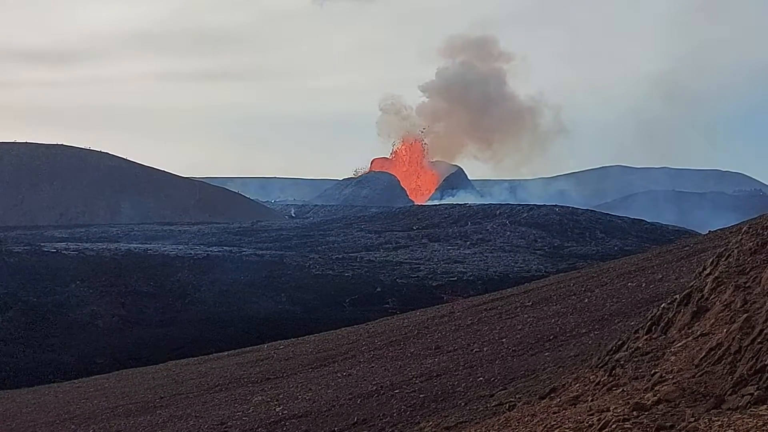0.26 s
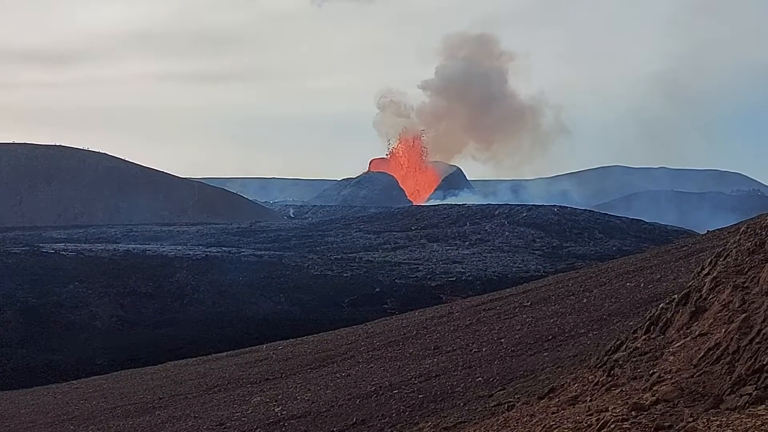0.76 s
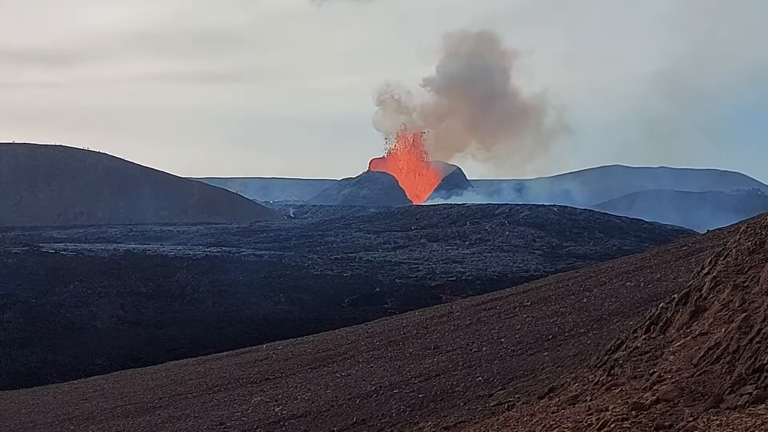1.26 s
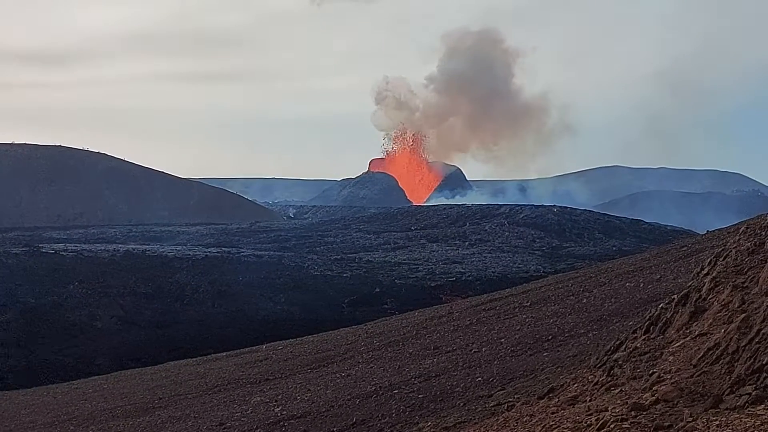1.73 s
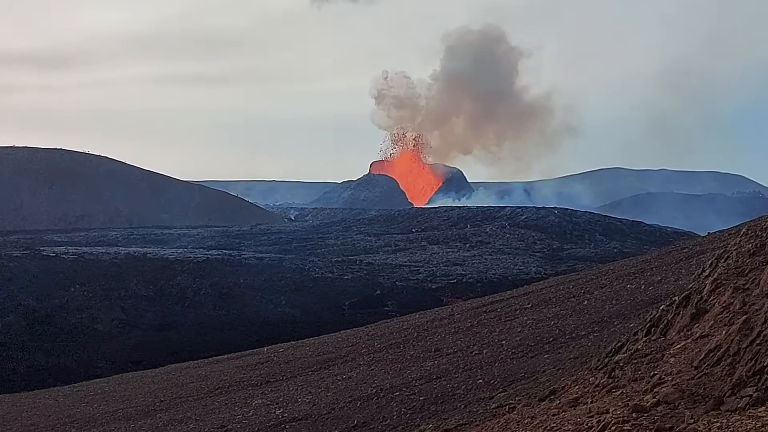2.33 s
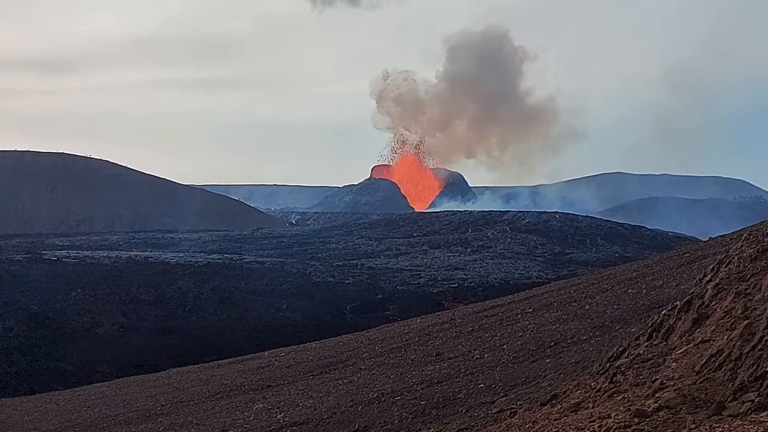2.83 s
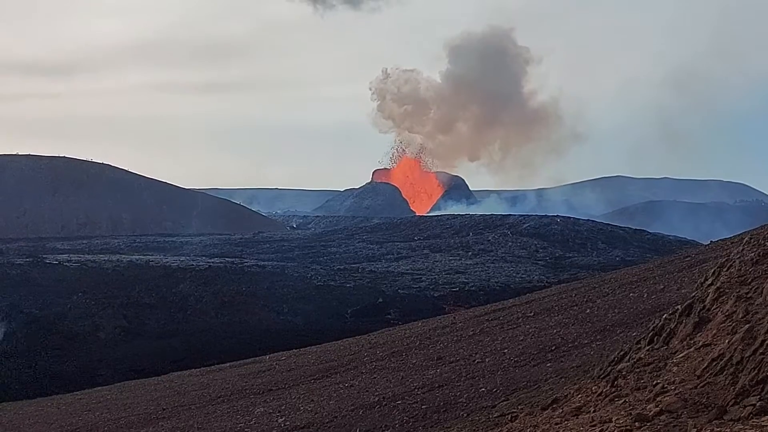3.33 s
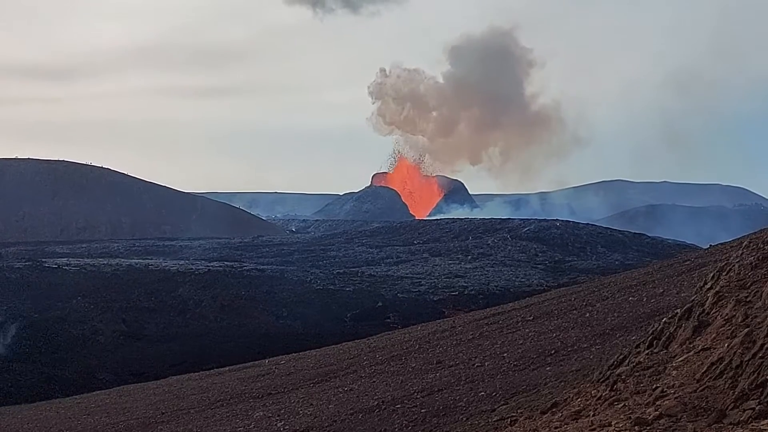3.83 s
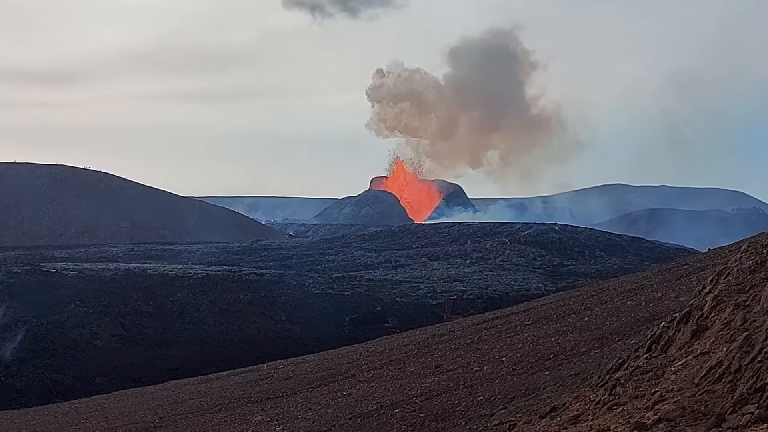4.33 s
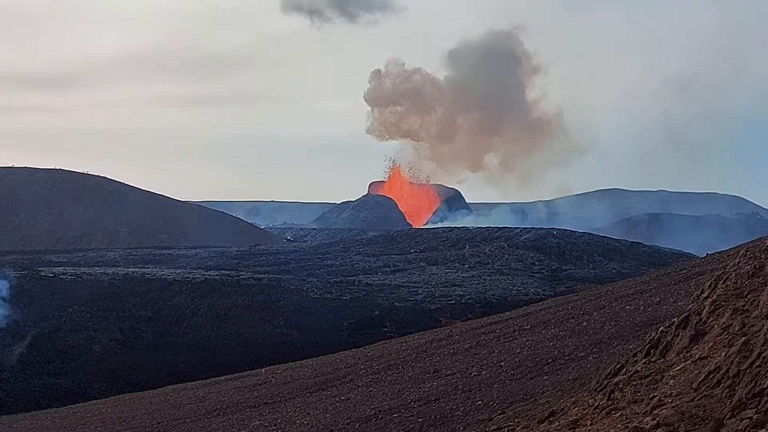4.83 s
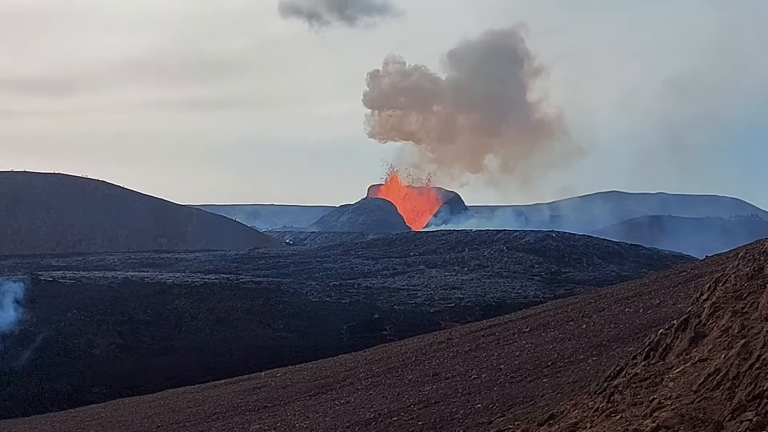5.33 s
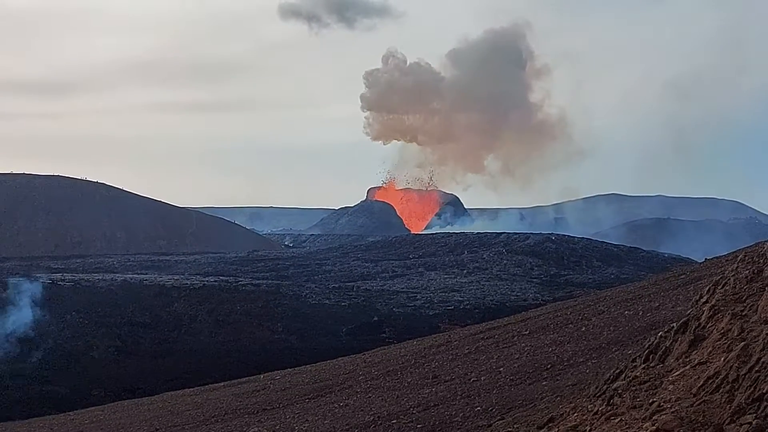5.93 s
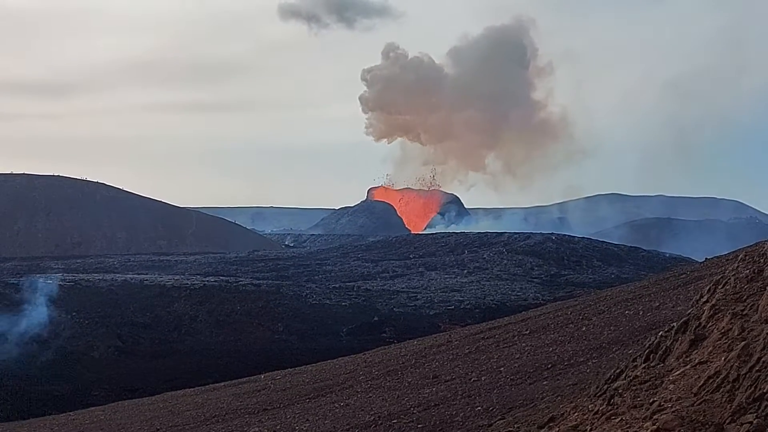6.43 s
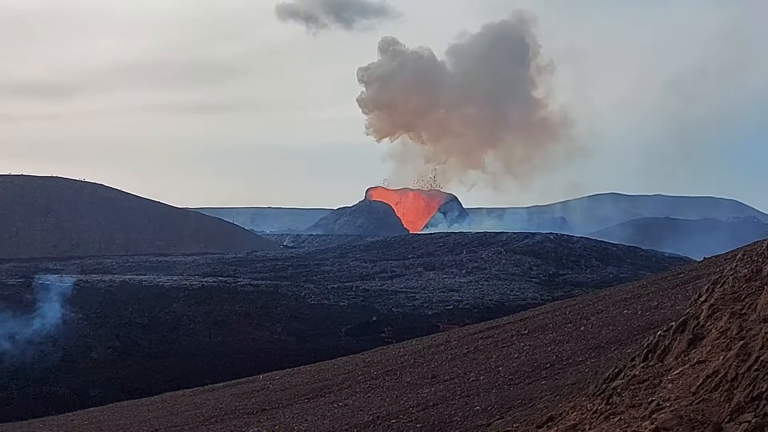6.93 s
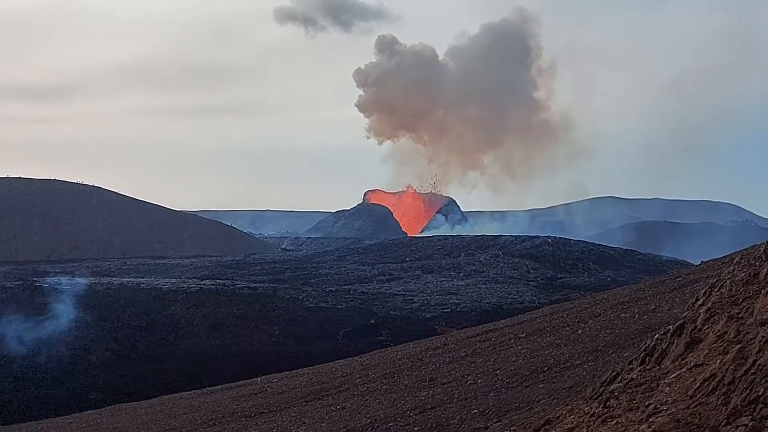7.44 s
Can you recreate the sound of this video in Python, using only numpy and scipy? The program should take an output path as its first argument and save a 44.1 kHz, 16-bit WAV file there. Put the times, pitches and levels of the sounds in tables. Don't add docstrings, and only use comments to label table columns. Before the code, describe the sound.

A far erupting vent rumbles steadily, its treble dulled by distance, lumpy with bubble bursts and a low resonant drone. A handheld-style stereo microphone catches gusts on the left only: early crackly flutter, later brief thumps, with left bass dropping in and out. Small case clicks on the right, grit scuffing around the middle and light cloth rustles near the end are very quiet details. Open air, no echo.

```python
import sys
import numpy as np
from scipy import signal
from scipy.fft import rfft, irfft
from scipy.io import wavfile
from scipy.ndimage import uniform_filter1d

SR = 44100
rng = np.random.default_rng(int(sys.argv[2]) if len(sys.argv) > 2 else 0)


def linear_from_db(decibels):
    return 10 ** (np.asarray(decibels, float) / 20)


def master_out(mix):
    frames = np.transpose(np.atleast_2d(mix))
    ceiling = np.clip(frames, -1, 1)
    pcm = np.round(ceiling * 32767).astype(np.int16)
    wavfile.write(sys.argv[1], SR, pcm)


N = 338688
TIME = np.arange(N) / SR
FREQS = np.arange(N // 2 + 1) * SR / N + 1e-3


def columns(table, at=TIME):
    x, *cols = np.transpose(table)
    return [np.interp(at, x, col) for col in cols]


def on_freqs(table):
    log_table = [(np.log(row[0]), *row[1:]) for row in table]
    return columns(log_table, np.log(FREQS))


def white():
    return rfft(rng.standard_normal(N)) * np.sqrt(SR / 2)


def unit(x):
    return x / np.sqrt(np.mean(x ** 2))


def walk(rate):
    hold = int(SR / rate)
    steps = np.repeat(rng.standard_normal(N // hold + 1), hold)
    return unit(uniform_filter1d(uniform_filter1d(steps, hold), hold)[:N])


def bumps(s, height, half_s):
    return sum(h * np.exp(-((TIME - t) / w) ** 2) for t, h, w in np.broadcast(s, height, half_s))


def below(x, hz, slope_hz):
    return irfft(rfft(x) * np.clip((hz - FREQS) / slope_hz + .5, 0, 1), N)


def band(hz, spread, x):
    edges = np.clip([hz / spread, hz * spread], 500, .45 * SR)
    return signal.sosfilt(signal.butter(3, edges, "band", fs=SR, output="sos"), x)


# time in seconds, jet hiss level in dB.
FLOW = [(0, -57), (.35, -56), (.8, -57.5), (1.4, -55), (1.8, -54.5), (2.1, -54), (2.6, -52.5), (3.0, -52),
        (3.5, -51.5), (3.85, -50), (4.13, -48.5), (4.6, -50.5), (5.1, -53), (5.7, -51.5), (6.25, -48.5),
        (6.97, -50.5), (7.37, -48.5), (7.68, -48.5)]
LAYER_DB = [-45.5, -40, -38, -52]
LAYER_FOLLOW = [0.76, 0.55, .8, 1.0]
# time in seconds, lift in dB.
HUM_SWELLS = [(.14, 11), (.58, 7), (1.2, 14.5), (2.17, 12), (2.551, 6.5), (2.95, 7.5), (3.33, 10),
              (3.62, 8), (3.9, 11.5), (4.15, 7.5), (4.33, 6), (4.7, 9.5), (4.87, 8), (5.05, 11.5),
              (5.199, 8), (5.36, 19), (5.78, 7.5), (6.09, 12), (6.5, 5.5), (6.74, 9.5), (6.9, 7.5),
              (7.38, 10), (7.7, 17.5)]
# time in seconds, boom lift in dB, roar lift in dB.
BURSTS = [(.02, 4, 2), (.16, 1, 3.2), (0.299, 3, 2.5), (.58, 2, 6), (1.2, 4, -0.5), (1.45, 3, -3.8),
          (1.78, 3.3, 0.5), (2.15, 1.5, 0.5), (2.55, 2, 1), (3.1, 0.5, 0), (3.55, 2, 1), (3.98, 2.5, 2),
          (4.45, 1.5, -2), (4.62, 0, 0.3), (5.05, 3, 0), (5.25, 1, 3.5), (5.62, 2, 0), (5.8, 4, -0.5),
          (6.05, 2.5, -1.2), (6.3, 5, 2.5), (6.67, 5, 2), (6.919, 4, 2.5), (7.2, 3.5, 4), (7.38, 3.5, 1.5),
          (7.68, -8.5, 1)]


def layers():
    reference_db, slug_s, burst_s = -52, .085, .084
    flow = columns(FLOW)[0] - reference_db
    s, boom_db, roar_db = np.transpose(BURSTS)
    hum_lift = bumps(*np.transpose(HUM_SWELLS), slug_s)
    lifts = [hum_lift, bumps(s, boom_db, burst_s), bumps(s, roar_db, burst_s), 0]
    return [db + share * flow + lift for db, share, lift in zip(LAYER_DB, LAYER_FOLLOW, lifts)]


# lower edge in Hz, upper edge in Hz.
JET_BANDS_HZ = [
    (90, 200),
    (200, 700),
    (700, 2000),
]
# frequency in Hz,
# level in dB per Hz.
JET_COLOUR = [(15, -81), (30, -69.5), (50, -56.5), (120, -57.5), (170, -61.5), (260, -59.5), (320, -61),
              (365, -68.5), (430, -63.5), (520, -67), (620, -67),
              (750, -74), (900, -77.5), (1050, -76), (1200, -79), (1350, -88.5), (1550, -86.5), (1750, -92.5),
            (2000, -95.5), (2300, -110), (2700, -122), (3300, -135), (5000, -160)]
# frequency in Hz, level in dB, lead in radians, scattered share in dB.
LEFT_PORT = [(200, .5, 0, -22), (310, .5, .25, -15), (380, -.5, .1, -11), (480, 0, 0, -14),
             (650, 0, .05, -12), (780, .5, .4, -5), (900, -4, .8, 2), (1050, -.5, .05, -8),
             (1300, -2.5, 0, -2), (1550, -2, -.1, -4), (1800, -7, -.4, 0), (2070, -14, -.8, 6),
             (2400, -8, -.8, 6)]
SURGE_OCTAVES = [7, 10]
SURGE_DB = [1.5, 0.52]


def jet(flicker_db=1.1):
    even_samples, even_share = SR // 5, .65
    colour = linear_from_db(on_freqs(JET_COLOUR)[0])
    port_db, lead, scatter_db = on_freqs(LEFT_PORT)
    right = white() * colour
    scattered = white() * colour * linear_from_db(scatter_db)
    left = linear_from_db(port_db) * (right * np.exp(1j * lead) + scattered)
    power = colour ** 2 * SR / N
    lifts = []
    for db, (low, high) in zip(layers()[1:], JET_BANDS_HZ):
        resting = power[(FREQS > low) & (FREQS < high)].sum()
        lifts.append(db - 10 * np.log10(resting))
    centres = np.log2([np.sqrt(low * high) for low, high in JET_BANDS_HZ])
    out, surge = 0, walk(22)
    for octave in np.arange(4, 12.6, .5):
        mask = np.cos(np.pi * np.clip(np.log2(FREQS) - octave, -.5, .5)) ** 2
        shares = [np.interp(octave, centres, row) for row in np.eye(len(lifts))]
        lift_db = sum(share * lift for share, lift in zip(shares, lifts))
        part = irfft(np.array([left, right]) * mask, N)
        slow = uniform_filter1d(part[1] ** 2, size=even_samples)
        part = part * (slow / slow.mean()) ** (-even_share / 2)
        surge_db = np.interp(octave, SURGE_OCTAVES, SURGE_DB) * surge
        out = out + part * linear_from_db(lift_db + surge_db + flicker_db * walk(7))
    return out


def vent_hum():
    hum_hz, width_hz, steadiness = 75.4, 4, .6
    hum = irfft(white() / (1 + ((FREQS - hum_hz) / width_hz) ** 2), N)
    hum = hum / uniform_filter1d(np.abs(hum), size=SR // 15) ** steadiness
    return unit(hum) * linear_from_db(layers()[0] - 1.5)


# frequency in Hz, left level in dB per Hz, right level in dB per Hz.
HISS = [(1500, -119, -118), (3300, -122, -122), (5000, -124, -123), (7750, -125, -124), (8000, -121, -123),
        (10000, -117, -120), (11500, -113, -116), (14000, -116, -119), (14500, -117, -120),
        (14800, -120, -121), (16500, -121, -121)]


def hiss():
    return np.array([irfft(white() * linear_from_db(db - .9), N) for db in on_freqs(HISS)])


# start in seconds, end in seconds, bass cut in dB.
GUSTS = [(.04, 1.88, 7), (.21, .33, 13), (.43, 1.7, 13), (.56, 1.67, 18), (1.8, 1.86, 5), (1.9, 3.2, 1.2),
         (3.23, 3.8, 6), (3.23, 3.39, 9), (3.57, 3.71, 6), (4.5, 4.55, 5), (5.38, 5.8, 2.2),
         (5.82, 5.88, 13), (6.33, 7.65, 2.5), (7.0, 7.15, 7), (7.19, 7.23, 9), (7.28, 7.35, 8),
         (7.53, 7.63, 9)]


def gust_cut():
    rise_s = .05
    return -sum(db * np.clip(np.minimum(TIME - a, b - TIME) / rise_s + .5, 0, 1) for a, b, db in GUSTS)


# bass cut in dB, thump level in dB, flutter level in dB.
WIND_LAW = [(0, -47.5, -55), (2, -38.5, -50.5), (4, -32.5, -50), (14, -29, -45), (35.5, -26.5, -39),
            (47, -18.5, -48.5)]
# frequency in Hz, level in dB per Hz.
THUMP = [(15, -14.5), (40, -3.5), (70, 1.5), (120, 0), (170, -6.5), (240, -10), (262, -13), (285, -46),
         (1000, -120)]
# frequency in Hz, level in dB per Hz.
FLUTTER = [(230, -50), (290, -5), (335, 0), (450, -4), (650, -8), (900, -17), (1300, -32), (1800, -55),
           (2500, -100)]


def wind():
    gusty_db, calm_db, strong_db = 1.5, -54, -46
    lump_db, lumps_per_s, bed_db = 5, 110, -2.5
    pops_per_s, pop_cut_db, pop_db, pop_scatter_db = 34, 6.5, 13.5, 2.5
    cut = -gust_cut()
    thump_db, flutter_db = (db + gusty_db * walk(10) for db in columns(WIND_LAW, cut))
    strong = np.clip((flutter_db - calm_db) / (strong_db - calm_db), 0, 1)
    lumps = linear_from_db(lump_db * strong * walk(lumps_per_s))
    lumps = lumps / np.sqrt(uniform_filter1d(lumps ** 2, size=SR // 5))
    push = rfft(rng.standard_normal(N) * lumps)
    ring = linear_from_db(on_freqs(FLUTTER)[0])
    thump = unit(irfft(push * linear_from_db(on_freqs(THUMP)[0]), N))
    bed = unit(irfft(push * ring, N))
    place, size, sign = rng.random((int(N / SR * pops_per_s), 3)).T
    at = ((np.arange(len(place)) + place) * SR / pops_per_s).astype(int)
    peak_db = pop_db + pop_scatter_db * np.sqrt(12) * (size - 1)
    kicks = np.zeros(N)
    kicks[at] = linear_from_db(peak_db) * np.sign(sign - .5) * (cut[at] > pop_cut_db)
    pops = irfft(rfft(kicks) * ring, N) / irfft(ring, N)[0]
    left = thump * linear_from_db(thump_db) + (strong * bed * linear_from_db(bed_db) + pops) * linear_from_db(flutter_db)
    return np.array([left, 0 * left])


# time in seconds, peak in dB, centre in Hz, spread as a ratio, port (0 left, 1 right).
TICKS = [(0.286, -47, 6000, 1.4, 1), (.2864, -52, 11950, 1.2, 1), (.3043, -55, 6000, 1.4, 1),
         (1.6136, -57, 6500, 1.2, 1), (1.7905, -55, 6000, 1.9, 1), (3.1014, -58, 14000, 1.2, 1),
         (3.6953, -58, 5500, 1.5, 1), (5.0294, -60, 4600, 1.24, 1), (5.222, -66.5, 4200, 1.1, 1),
         (5.8138, -38.5, 10500, 2.9, 1), (5.9311, -55.5, 5560, 1.2, 1), (6.5026, -61, 4200, 1.3, 1),
         (6.6215, -58, 7050, 1.5, 1), (6.898, -53, 9000, 1.6, 0), (7.123, -67.5, 6500, 1.1, 1),
         (7.3184, -60.5, 10500, 1.4, 0), (7.4106, -60, 7000, 2.1, 0)]


def ticks():
    out = np.zeros((2, N))
    for s, db, hz, spread, port in TICKS:
        click = band(hz, spread, np.arange(512) == 0)
        out[port, int(s * SR):][:512] += click / np.abs(click).max() * linear_from_db(db)
    return out


# time in seconds, peak in dB, 60 dB decay time in seconds,
# left minus right in dB, centre in Hz.
SCUFFS = [(4.045, -66, .1, -5, 2900), (4.047, -72, .06, -8, 3700), (4.06, -73, .9, -5, 2900),
          (4.2, -74, .9, -4, 2700), (4.46, -79, .9, -3, 2700), (4.328, -74, .08, -3, 2602),
          (4.329, -75, .06, -5.5, 3700), (4.385, -74, .2, -2, 3100), (4.444, -61.5, .13, -7, 2750),
          (4.445, -72, .1, -2, 4100), (4.557, -72, .2, -3, 2690), (4.592, -68, .1, -8, 2730),
          (4.635, -78, .08, -5, 2700), (5.55, -82, .04, -1, 3500), (5.685, -76, .05, -7, 3990),
          (5.863, -69, .14, -7, 3800), (5.865, -71, .12, -7, 3250), (5.866, -75, .12, -5, 4800),
          (.289, -77, .2, -16, 5800)]


def scuffs(grain_db=8.5):
    out, t = np.zeros((2, N)), np.arange(8192) / SR
    for s, db, t60, pan_db, hz in SCUFFS:
        grains = linear_from_db(grain_db * np.repeat(rng.standard_normal(64), 128))
        noise = rng.standard_normal(8192) * grains
        burst = band(hz, 1.13, noise * linear_from_db(-60 * t / t60))
        port_db = db + np.array([[pan_db], [-pan_db]]) / 2
        out[:, int(s * SR):][:, :8192] += burst / np.abs(burst).max() * linear_from_db(port_db)
    return out


# frequency in Hz, level in dB per Hz.
CLOTH = [(3000, -41.5), (5000, -15), (8000, -9.5), (11500, 2.2), (14000, -3), (16000, -11)]
# time in seconds, peak in dB, half length in seconds.
PUFFS = [
    (2.44, -76, 0.16),
    (2.8, -82.5, .12),
    (3.452, -79.5, 0.2),
    (4.08, -82, .15),
    (6.914, -75.5, .1),
    (7.045, -81, .1),
    (7.363, -74, 0.11),
    (7.596, -73.5, 0.17),
]


def cloth(crackle_db=2.5):
    s, db, half_s = np.transpose(PUFFS)
    rustle = unit(irfft(white() * linear_from_db(on_freqs(CLOTH)[0]), N))
    left = rustle * bumps(s, linear_from_db(db), half_s) * linear_from_db(crackle_db * walk(91))
    return np.array([left, 0 * left])


CUT_HZ, CUT_SLOPE_HZ = 285, 40


def scene():
    block_hz, block_share = 650, .35
    fountain = jet() + vent_hum()
    blocked = below(fountain[0], block_hz, block_hz) - below(fountain[0], CUT_HZ, CUT_SLOPE_HZ)
    fountain[0] += blocked * (linear_from_db(block_share * gust_cut()) - 1)
    return fountain + hiss() + wind() + ticks() + scuffs() + cloth()


def band_limit(x):
    return signal.sosfilt(signal.butter(12, 15720, fs=SR, output="sos"), x)


def record(dry):
    chatter, chatter_open, hold_db, deep_hz = .35, .6, 34, 110
    cut_db = gust_cut()
    unsettled = np.clip(np.minimum(-cut_db, hold_db + cut_db), 0, None)
    cut_db = cut_db + chatter * unsettled * np.minimum(walk(25), chatter_open)
    bass = below(dry[0], CUT_HZ, CUT_SLOPE_HZ)
    deep = below(dry[0], deep_hz, CUT_SLOPE_HZ)
    left = dry[0] - bass + (bass - deep) * linear_from_db(.85 * cut_db) + deep * linear_from_db(2.65 * cut_db)
    return band_limit(np.array([left, dry[1]]))


dry = scene()
out = record(dry)
master_out(out)
```